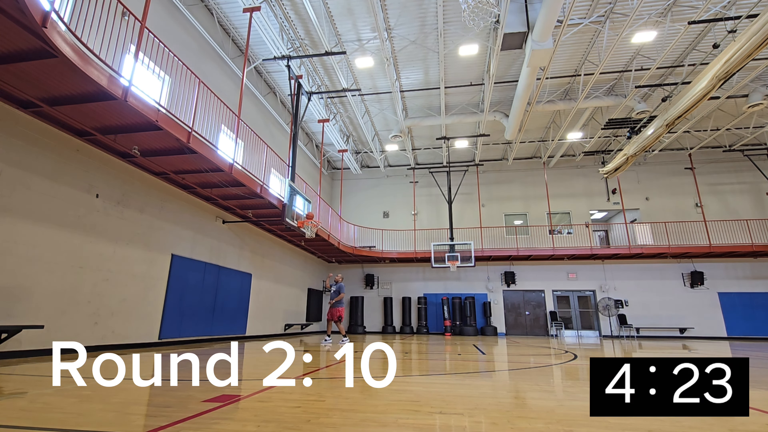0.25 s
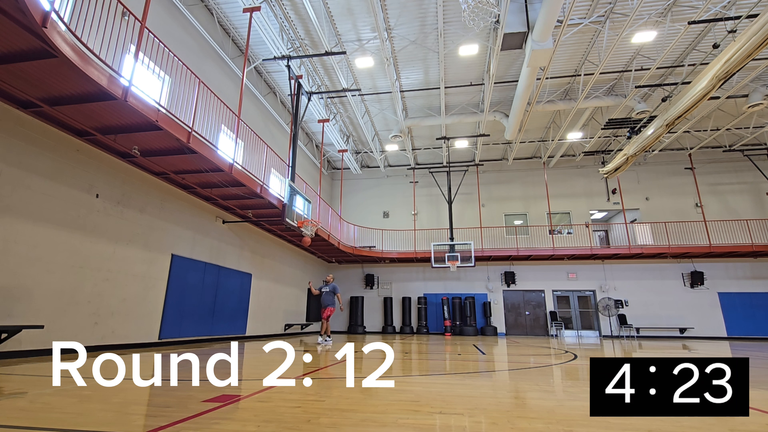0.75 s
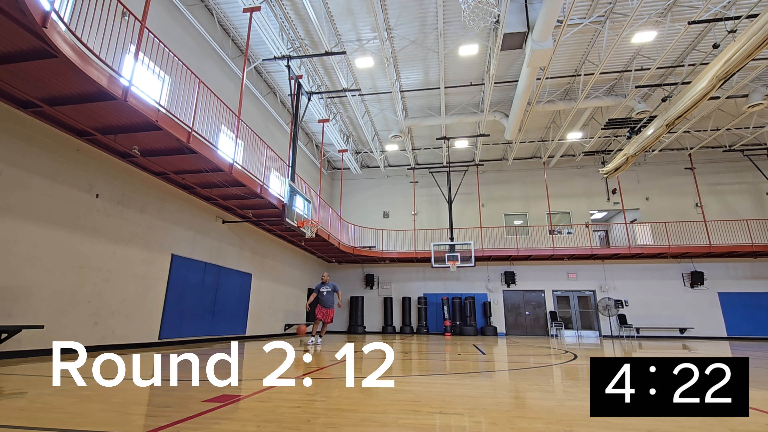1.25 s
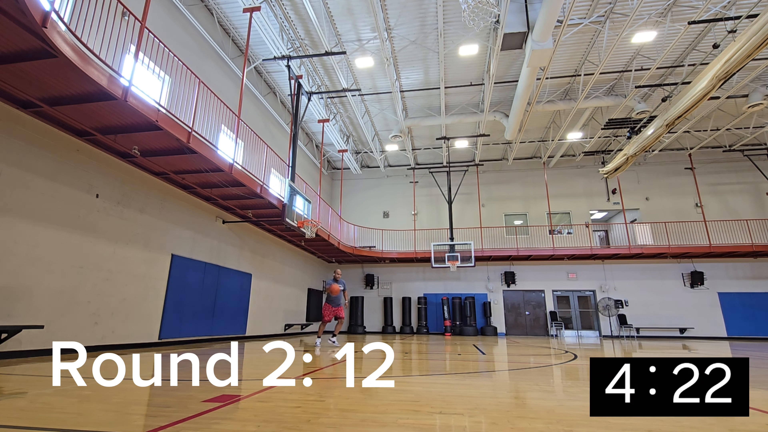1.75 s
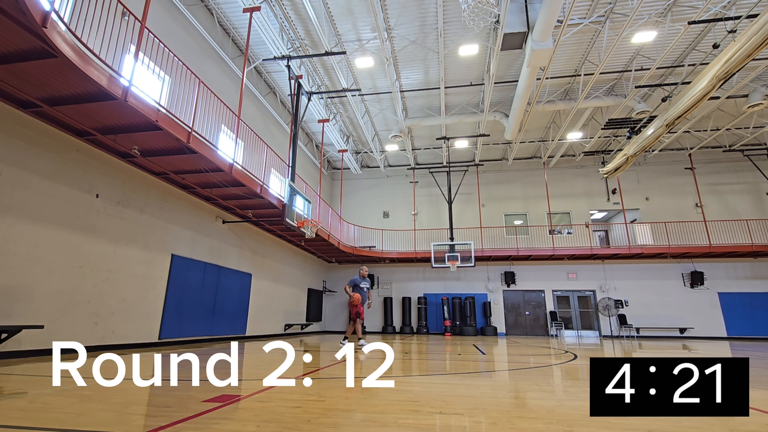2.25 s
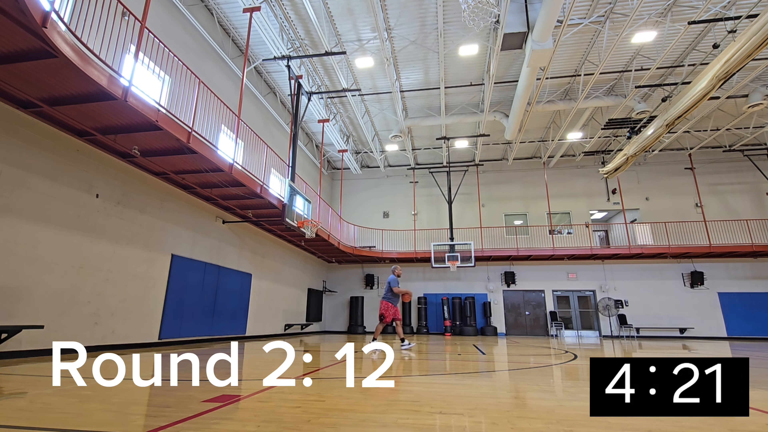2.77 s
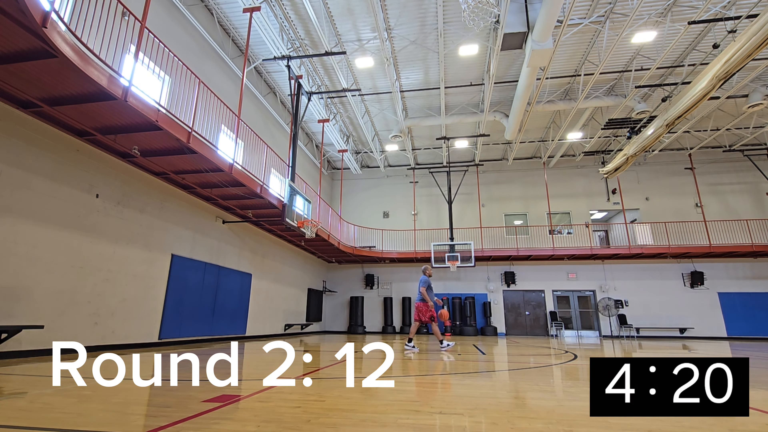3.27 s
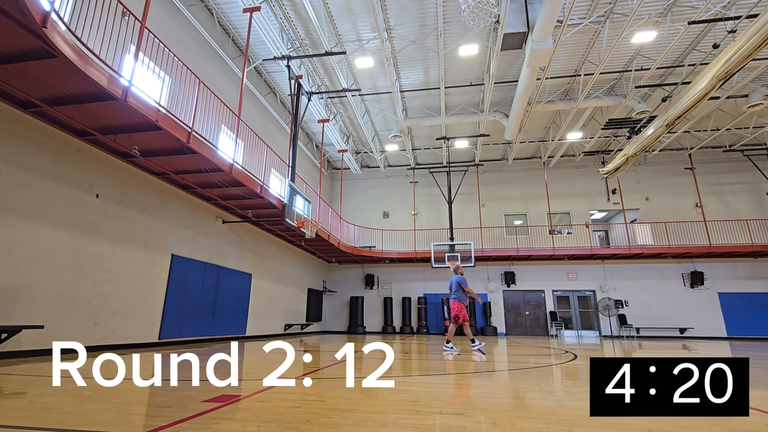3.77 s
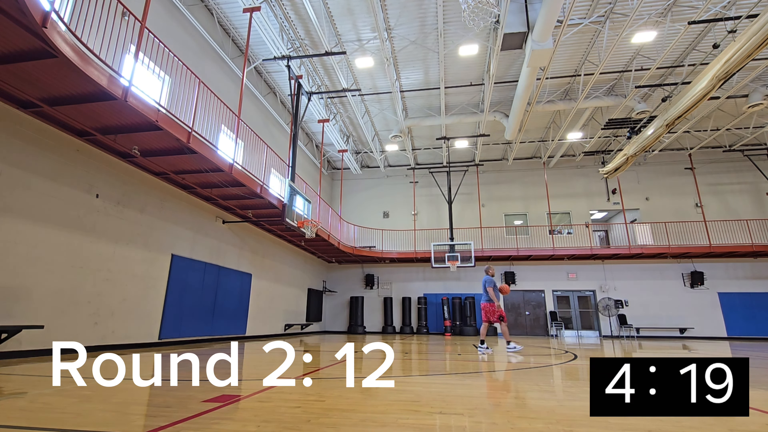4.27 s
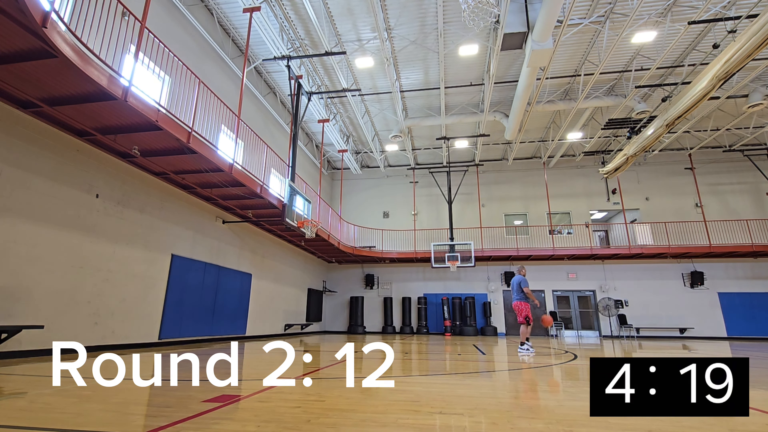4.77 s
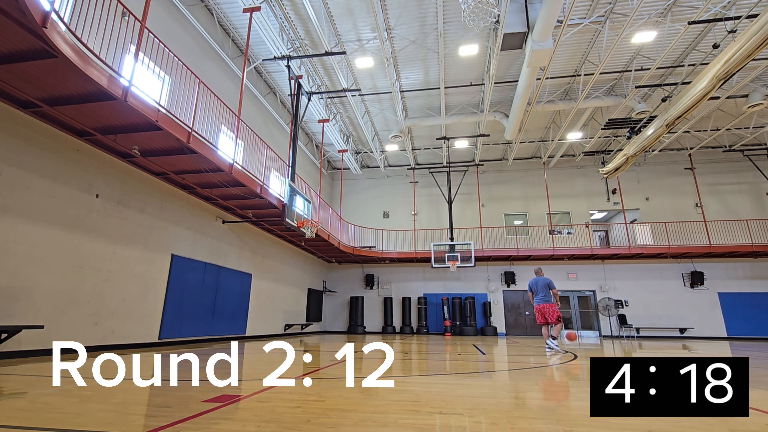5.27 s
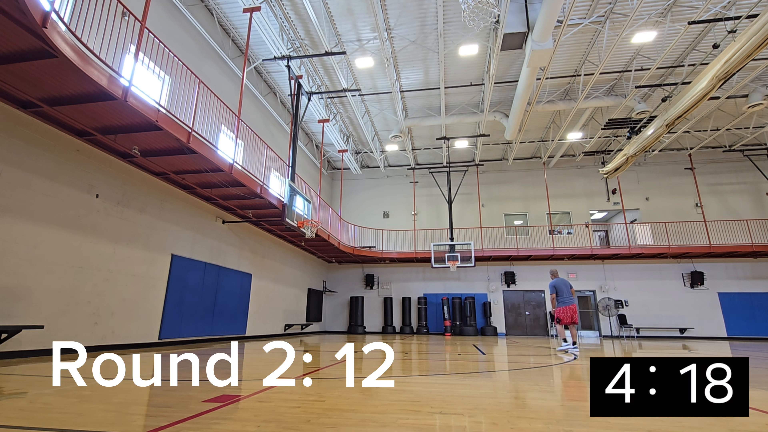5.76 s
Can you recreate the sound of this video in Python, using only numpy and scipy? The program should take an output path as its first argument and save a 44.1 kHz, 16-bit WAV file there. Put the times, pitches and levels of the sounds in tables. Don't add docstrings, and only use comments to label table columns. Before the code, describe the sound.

In a large echoing gym, a brief sole squeak and net swish precede five resonant basketball bounces over low ventilation hum.

```python
import sys
import numpy as np
from scipy import signal
from scipy.io import wavfile

SR = 44100
rng = np.random.default_rng(int(sys.argv[2]) if len(sys.argv) > 2 else 0)


def how_loud(loudness_db):
    steps = np.asarray(loudness_db, float) / 20
    return 10 ** steps


def materialize(psi):
    bounded = np.clip(np.atleast_2d(psi).T, -1, 1)
    quanta = np.round(bounded * 32767).astype(np.int16)
    wavfile.write(sys.argv[1], SR, quanta)


N = 265482
T = np.arange(N) / SR

# t/s, slap peak/dB, left lag/ms, boards/dB, hall tail/dB
BOUNCES = [
    (1.2344, -7, -.1, -6, -18),
    (1.9835, -8, -.09, -7.5, -21),
    (3.1332, -14.5, .01, -12, -24.5),
    (4.6852, -11.5, .15, -14.5, -24),
    (5.2678, -14.5, .25, -13.5, -24),
]
# boards t60 scale, tail tilt/(dB/octave), crack top/dB,
# extra ring near 1.6 kHz/dB, near walls/dB
SPOTS = [
    (1.53, 0.38, -6, -1.2, 4.5),
    (1.16, 0.2, -1, 0, 8.5),
    (1.4, -0.28, -2, -2, 7),
    (.6, 0.3, -5, 2, 4.5),
    (1.7, 0.25, -7, 2, 3.5),
]
# f/Hz, t60/s
HALL_T60 = [(40, 6.8), (100, 4.44), (300, 2.26), (900, 3.86), (2400, 4.23), (5000, 2.47), (9000, 1.14),
            (16000, 0.36)]

EDGES_HZ = 24 * 2 ** (np.arange(30) / 3)
WIDTHS_HZ = np.diff(EDGES_HZ)
CENTRES_HZ = np.sqrt(EDGES_HZ[1:] * EDGES_HZ[:-1])


def at_hz(points, hz):
    table_hz, values = np.array(points).T
    return np.interp(np.log(hz), np.log(table_hz), values)


def power_per_hz(shape, hz):
    return how_loud(2 * at_hz(shape, hz)) / np.sum(how_loud(2 * at_hz(shape, CENTRES_HZ)) * WIDTHS_HZ)


def rms_one(x):
    return x / np.sqrt(np.mean(x ** 2) + 1e-20)


def sides(db):
    return how_loud(np.array([[db / 2], [-db / 2]]))


def add(out, x, s):
    i = round(s * SR)
    out[:, i:i + x.shape[1]] += x[:, :N - i]


def ring(hz, t60, rise_s):
    t = T[:SR // 2]
    return np.sin(2 * np.pi * hz * t) * how_loud(-60 * t / t60) * (1 - np.exp(-t / rise_s))


def slap(lag_ms, top_db):
    # f/Hz, level/dB, t60/s
    crack_modes = [(6600, -8, 0.0022), (11900, 3, 0.00068), (9100, -11, 0.0029), (7400, -14, .002)]
    crack_db, width_ms, recovery_ms = -2, 0.09, 0.55
    t_ms = T[:300] * 1000 - lag_ms - 1
    spike = -np.exp(-(t_ms / width_ms) ** 2 / 2)
    spike -= 0.2 * (t_ms > 0) * np.exp(-np.abs(t_ms) / recovery_ms)
    since_s = np.maximum(t_ms + 0.04, 0) / 1000
    crack = 0
    for hz, db, t60 in crack_modes:
        mode_db = crack_db + top_db * np.interp(hz, [6000, 10000], [-.6, 1]) + db
        crack = crack + how_loud(mode_db - 60 * since_s / t60) * np.sin(2 * np.pi * hz * since_s)
    return spike - crack


def ball_slaps():
    pan_db, pan_db_per_ms = 1.5, -9
    out = np.zeros((2, N))
    for (s, slap_db, lag_ms, *_), (_, _, top_db, *_) in zip(BOUNCES, SPOTS):
        pair = [slap(lag_ms / 2, top_db), slap(-lag_ms / 2, top_db)]
        add(out, how_loud(slap_db) * sides(pan_db + pan_db_per_ms * lag_ms) * pair, s - 1 / 1000)
    return out


def board_booms():
    # f/Hz, level/dB, t60/s
    board_modes = [(90.6, -1.5, 0.17), (68.1, -4, 0.28), (185, -13.5, 0.091), (268, -11, 0.065),
                   (371, -10, 0.033)]
    out = np.zeros((2, N))
    for (s, _, _, boards_db, _), (lasting, *_) in zip(BOUNCES, SPOTS):
        boom = sum(how_loud(db) * ring(hz, t60 * lasting, rise_s=.4 / hz) for hz, db, t60 in board_modes)
        add(out, how_loud(boards_db) * boom * [[1], [1]], s + .0011)
    return out


def slap_echoes():
    # bounce 0-4, delay/ms, left/dB, right/dB
    echoes = [(0, 2.3, -7, -22), (0, 8.7, -14, -19), (0, 10.4, -12, -24), (1, 2.4, -11, -22),
              (1, 13.1, -20, -28), (2, 2.4, -24, -30), (2, 19.2, -27, -34), (3, .8, -19, -20),
              (4, .9, -21, -22), (4, 22.8, -23, -32)]
    out = np.zeros((2, N))
    for k, delay_ms, left_db, right_db in echoes:
        k = round(k)
        gains = how_loud(np.c_[[left_db, right_db]])
        add(out, gains * slap(0, SPOTS[k][2]), BOUNCES[k][0] + (delay_ms - 1) / 1000)
    return out


def wall_pings():
    # t/s, length/s, f/Hz, left/dB
    ping_table = [(1.250, .005, 1700, -19), (1.9955, .005, 1800, -19), (2.001, .006, 2150, -13),
                  (2.017, .003, 4000, -27), (3.146, .005, 3000, -29), (3.154, .004, 1700, -26),
                  (3.157, .005, 2150, -25), (3.166, .007, 3200, -32), (4.698, .005, 3100, -31),
                  (4.707, .009, 1650, -21), (5.290, .004, 1800, -24), (5.294, .004, 1900, -22)]
    right_db = -6
    out = np.zeros((2, N))
    for s, length_s, hz, db in ping_table:
        t = T[:round(length_s * SR)]
        tone = np.sin(2 * np.pi * (hz * t - [[0], [.3]]))
        add(out, how_loud(np.c_[[db, db + right_db]]) * tone * np.sin(np.pi * t / length_s), s)
    return out


def thuds():
    # t/s, peak/dB, f/Hz
    blows = [(.58, -21.5, 58.4), (0.809, -19.5, 66), (1.342, -12, 101), (1.72, -11.5, 83), (2.033, -6, 73),
             (2.105, -14, 125.4), (2.218, -10, 78.6), (2.421, -10.5, 74), (3.24, -13.5, 87),
             (3.272, -14.5, 94), (3.481, -19, 78.5), (3.581, -20.5, 91), (3.681, -20.5, 80),
             (3.80, -24, 71), (4.7737, -10.5, 96), (5.329, -11, 87.3), (5.39, -14, 74.5), (5.55, -19, 80),
             (5.779, -15.5, 94)]
    out = np.zeros((2, N))
    for s, db, hz in blows:
        add(out, how_loud(db - 0.1) * ring(hz, t60=0.25, rise_s=0.0025) * [[1], [1]], s)
    return out


def squeaks():
    # t/s, length/s, f/Hz, direct/dB, hall/dB
    sole_slips = [
        (.201, 0.062, 6257, -35, -28),
        (0.232, 0.04, 7540, -51, -51),
        (.228, .035, 14000, -65, -62),
        (5.552, 0.024, 6410, -40.5, -46),
    ]
    octave_levels = [-15.5, -8, -20, -21]
    pan_db, grit_share = 11, 0.11
    far_wall_s, far_wall_db = .098, -7
    out = np.zeros((2, N))
    late_s = T[:SR + SR // 4]
    for (s, length_s, hz, db, hall_db), octave_db in zip(sole_slips, octave_levels):
        t = T[:round(length_s * SR)]
        wander = rng.standard_normal((2, 40))
        waver, flutter = [np.interp(t * 250, np.arange(40), row) for row in wander]
        phase = 2 * np.pi * np.cumsum(hz * (1 + 0.309 * length_s * (waver - waver.mean()))) / SR
        rasp = rms_one(np.convolve(rng.standard_normal(SR // 10), np.hanning(50)))
        grit = 1 + grit_share * rasp[:len(t)]
        swell = np.sin(np.pi * (t / length_s) ** .7) ** .7
        partials = [(1, 0)]
        if 4 * hz < SR:
            partials.append((2, octave_db))
        for multiple, partial_db in partials:
            tone = how_loud(partial_db) * rms_one(np.sin(multiple * phase) * how_loud(2 * flutter) * grit * swell)
            decay = how_loud(-60 * late_s / at_hz(HALL_T60, multiple * hz))
            hall = rng.standard_normal((2, len(late_s))) * decay * (1 - np.exp(-late_s / 0.0066))
            add(out, how_loud(db) * sides(pan_db) * tone, s)
            add(out, how_loud(db + far_wall_db) * sides(-pan_db / 2) * tone, s + far_wall_s)
            add(out, how_loud(hall_db) * signal.fftconvolve(hall, [tone]) / np.sqrt(len(t)), s)
    return out


def net_power(hz):
    # t/s, hold/s, level/dB
    brushes = [
        (.545, .03, -76),
        (0.59, .05, -53.5),
        (1.02, .006, -64),
    ]
    # f/Hz, density/dB per Hz
    net_shape = [(1500, 13.5), (4000, 2.5), (9000, -1), (12000, -8.5), (16000, -6)]
    rise_db_per_s, fall_db_per_s = 1098, 66
    power = 0
    for s, hold_s, db in brushes:
        slope_db = np.minimum(rise_db_per_s * (T - s), fall_db_per_s * (s + hold_s - T))
        power = power + how_loud(2 * (db + np.minimum(0, slope_db)))
    return power * how_loud(2 * at_hz(net_shape, hz)) / 3000 * (hz > 1200)


def tail_power(hz):
    # f/Hz, density/dB per Hz
    tail_shape = [(25, -39), (59, 1), (114, -2.5), (170, -13), (230, -14.5), (340, -14), (560, -21.5),
                  (880, -29.5), (1300, -21.5), (2160, -27.5), (3000, -31), (4300, -34.5), (7500, -43),
                  (16000, -50.5)]
    earlier_db = -42.5
    hollow_boom_db = 4.5
    near_t60_s, boom_cycles = 0.1, 6
    blows, near = np.zeros((2, N))
    blows[0] = how_loud(2 * earlier_db)
    for (s, *_, tail_db), (lasting, tilt_db, _, ring_db, near_db) in zip(BOUNCES, SPOTS):
        i = round(s * SR)
        hollow_db = hollow_boom_db * (lasting < 1) * (hz < 170)
        extra_db = ring_db * np.exp(-2 * np.log2(hz / 1600) ** 2)
        blows[i] = how_loud(2 * (tail_db + hollow_db + extra_db + tilt_db * np.log2(hz / 500)))
        near[i] = blows[i] * how_loud(2 * near_db)
    late = signal.lfilter([1], [1, -how_loud(-120 / at_hz(HALL_T60, hz) / SR)], blows)
    early = signal.lfilter([1], [1, -how_loud(-120 / near_t60_s / SR)], near + 1e-18)
    fill = np.exp(-1 / ((0.01 + boom_cycles / hz) * SR))
    return signal.lfilter([1 - fill], [1, -fill], late + early) * power_per_hz(tail_shape, hz)


def air_power(hz):
    # f/Hz, density/dB per Hz
    air_shape = [(15, -45), (25, -9), (48, -6), (108, -7), (170, -15.5), (185, -12), (270, -19.5),
                 (363, -12), (405, -16), (591, -17), (863, -21.5), (4250, -36), (10400, -63.5),
                 (16000, -68)]
    return how_loud(2 * -34.5) * power_per_hz(air_shape, hz)


def diffuse_field():
    # f/Hz, likeness
    likeness = [(60, 0.92), (130, 0.78), (290, 0.93), (640, 0.086), (1410, -0.054), (3100, 0.016),
                (6820, -0.18), (15000, 0.19)]
    # f/Hz, difference/dB
    lean = [(60, -0.4), (300, -0.5), (700, 1.4), (1500, 3), (5000, 0), (12000, 3)]
    out = 0
    white = rng.standard_normal((2, 2, N + SR))
    for k, hz in enumerate(CENTRES_HZ):
        band = signal.butter(2, EDGES_HZ[k:k + 2], "band", fs=SR, output="sos")
        mid, side = signal.sosfilt(band, white[k % 2])[:, SR:]
        power = tail_power(hz) + air_power(hz) + net_power(hz)
        power = power * how_loud(1.05 * np.interp(T * 90, np.arange(600), rng.standard_normal(600)))
        alike = np.clip(at_hz(likeness, hz), -1, 1)
        pair = np.sqrt(1 + alike) * mid + np.sqrt(1 - alike) * side * [[1], [-1]]
        out = out + np.sqrt(power * SR / 4) * sides(at_hz(lean, hz)) * pair
    return out


def mains_hum():
    # f/Hz, peak level/dB
    hum_tones = [(122, -42), (60.1, -37.5)]
    return sum(how_loud(db + 0.5) * np.sin(2 * np.pi * hz * T) for hz, db in hum_tones)


def scene():
    ball = ball_slaps() + board_booms() + slap_echoes() + wall_pings()
    return ball + thuds() + squeaks() + diffuse_field() + mains_hum()


def roll_off(x):
    return signal.sosfilt(signal.butter(12, 16840, fs=SR, output="sos"), x)


def record(dry):
    gentle = signal.butter(8, 15900, fs=SR, output="sos")
    steep = signal.cheby2(10, 50, 16900, fs=SR, output="sos")
    mix = signal.sosfilt(np.vstack([gentle, steep]), dry)
    return roll_off(mix)


dry = scene()
out = record(dry)
materialize(out)
```